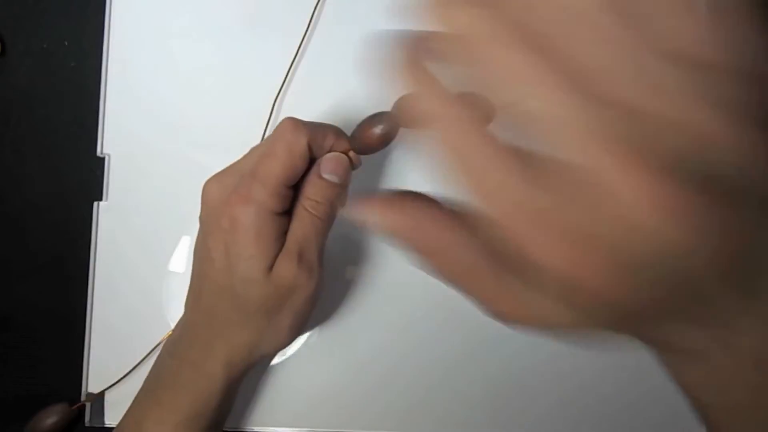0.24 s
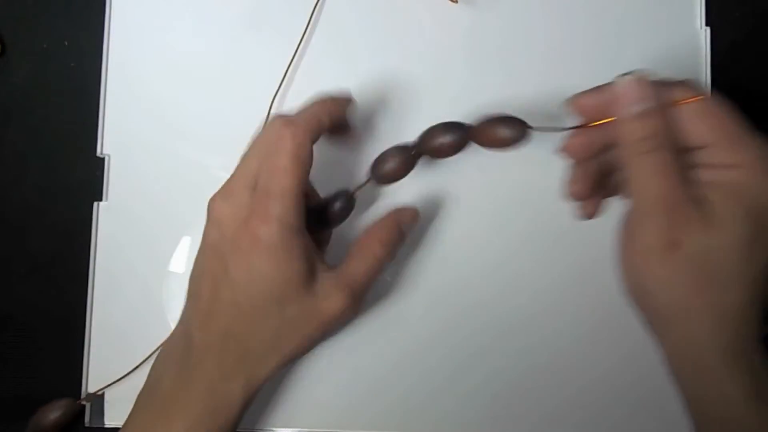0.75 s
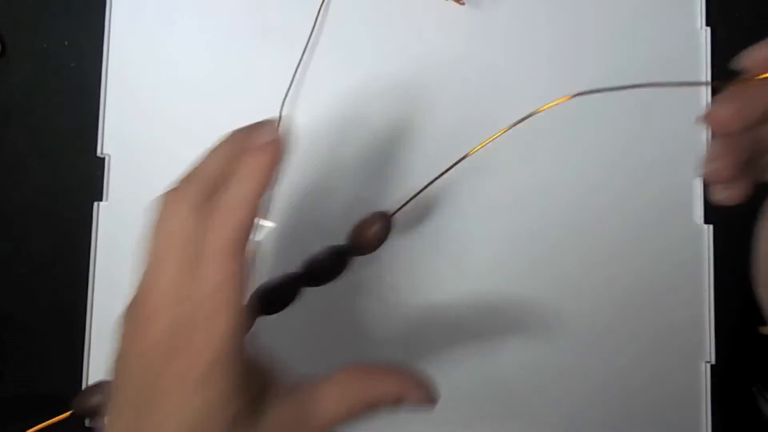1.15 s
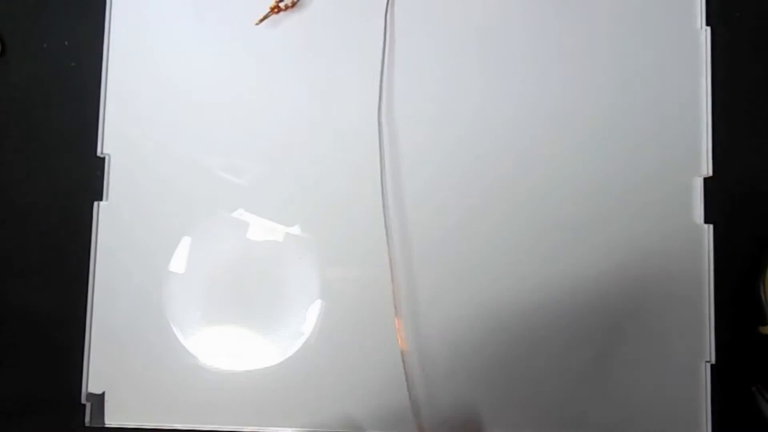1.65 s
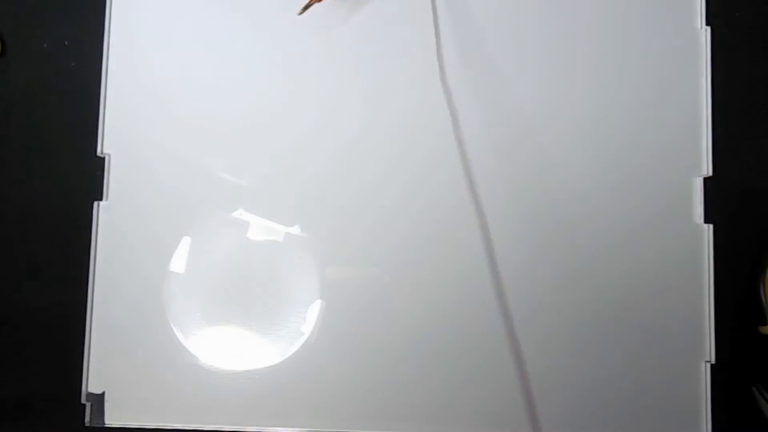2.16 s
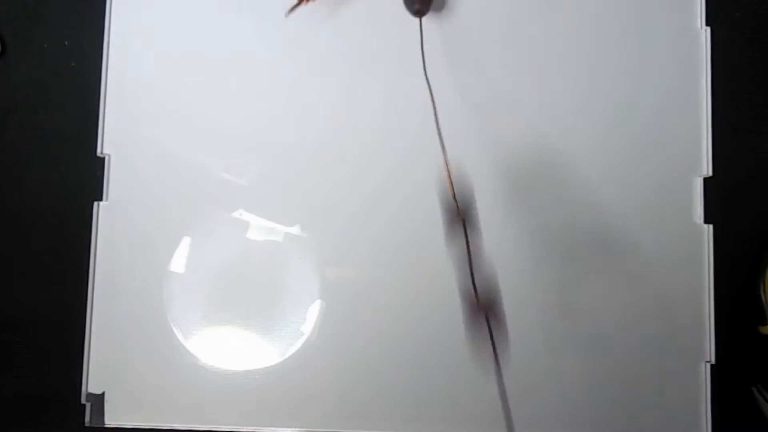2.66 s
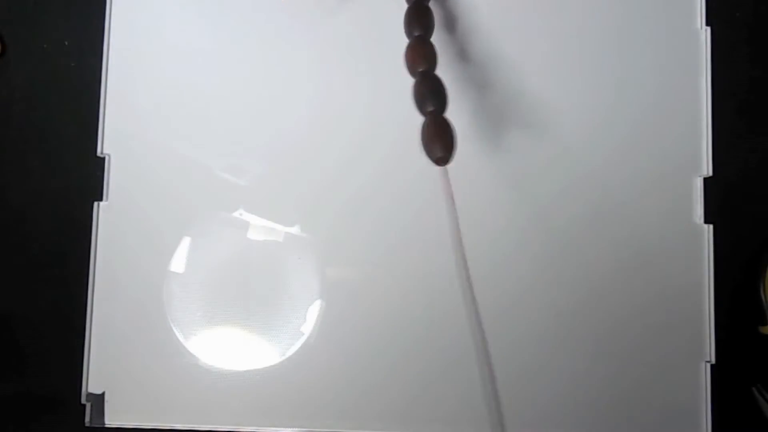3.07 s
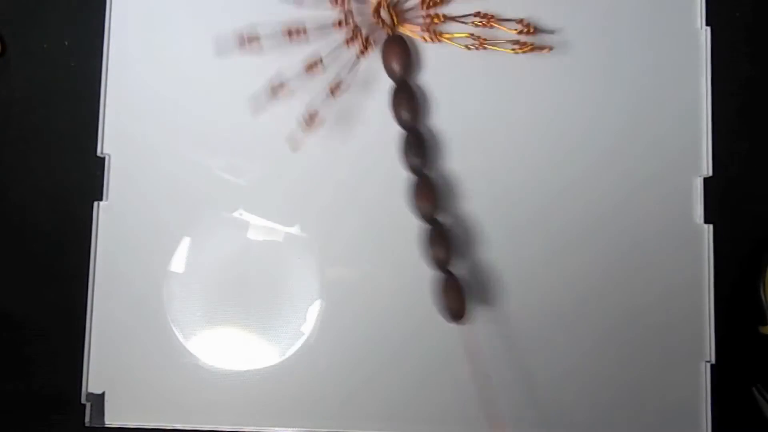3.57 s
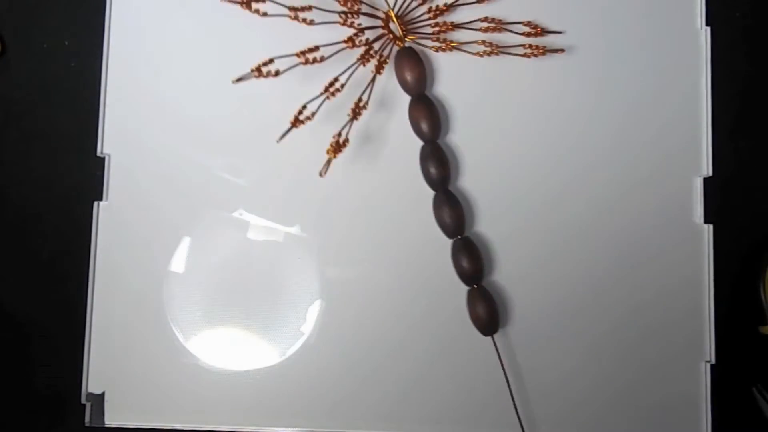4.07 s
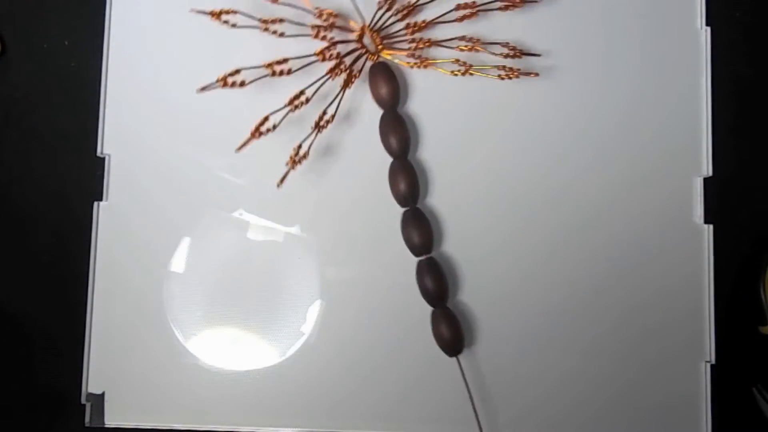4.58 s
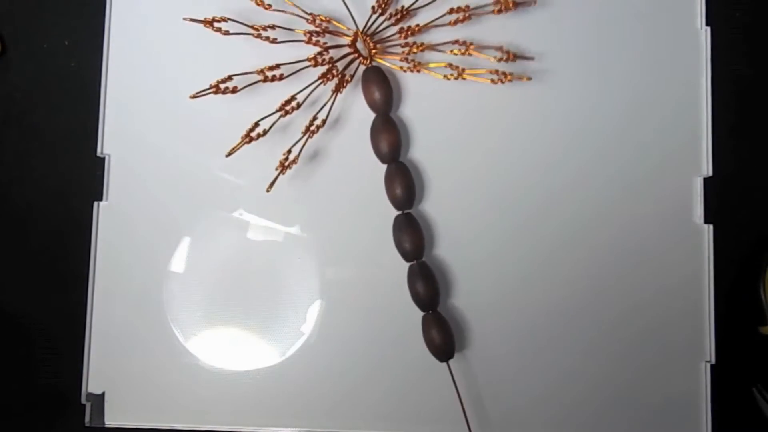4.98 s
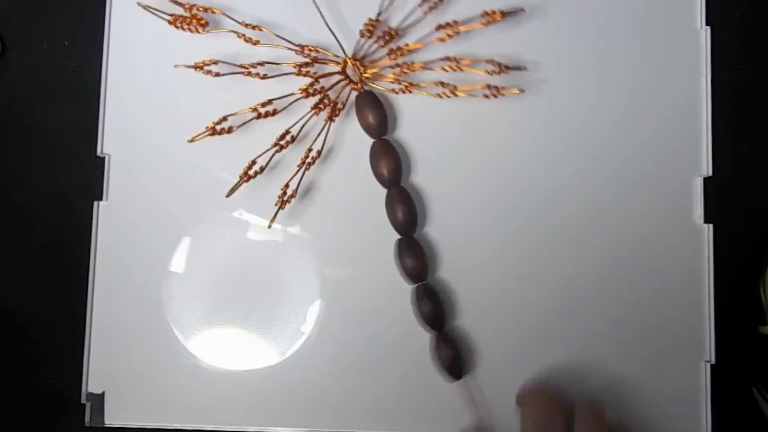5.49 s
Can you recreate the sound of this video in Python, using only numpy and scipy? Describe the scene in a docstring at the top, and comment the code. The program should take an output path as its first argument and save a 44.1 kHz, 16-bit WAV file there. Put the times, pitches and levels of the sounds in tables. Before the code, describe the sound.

Close, dry bead clicks and tiny wire squeaks build to a burst of hard wooden cracks, then faint rattles and dull bumps in a quiet room.

```python
"""Wooden beads on a copper wire above a plastic board in a quiet room, 5.7 s.
Scattered clacks (decaying knock trains through wood modes) open; squeaks (stick-slip tones) and rattles join
from 1.2 s. The loudest clacks fall at 2.6-3.1 s, the strongest table bumps (damped modes) at 4.6-5.0 s.
Clacks, bumps, rattles and squeaks close it. Hand rustle (grainy noise), room noise and hum run throughout."""
import sys
import numpy as np
from scipy import signal
from scipy.fft import rfft, irfft
from scipy.io import wavfile
from scipy.ndimage import uniform_filter1d

SR = 44100
rng = np.random.default_rng(int(sys.argv[2]) if len(sys.argv) > 2 else 0)


def dump(signal):
    """Clip the signal to [-1, 1] and save it as 16-bit WAV at the path in sys.argv[1]."""
    limited = np.clip(np.atleast_2d(signal).T, -1, 1)
    pcm = np.round(limited * 32767).astype(np.int16)
    wavfile.write(sys.argv[1], SR, pcm)


N = 253129


def gain_of(db):
    """Amplitude factor of a level in dB."""
    return 10 ** (np.asarray(db) / 20)


def evened(x):
    """Scale to unit RMS."""
    return x / np.sqrt(np.mean(x ** 2) + 1e-20)


def read(points, hz):
    """Interpolate a (frequency, value) table over log frequency."""
    f, value = np.transpose(points)
    return np.interp(np.log(hz + 1), np.log(f + 1), value)


def add(mix, start_s, sound):
    """Mix a sound in at its start time, cut at the end of the mix."""
    part = mix[round(start_s * SR):][:len(sound)]
    part += sound[:len(part)]


def band(x, lo_hz, hi_hz):
    """Band-pass, then unit RMS."""
    return evened(signal.sosfilt(signal.butter(2, [lo_hz, hi_hz], "band", fs=SR, output="sos"), x))


def highpass(x, order, hz):
    """Remove what lies below a frequency."""
    return signal.sosfilt(signal.butter(order, hz, "high", fs=SR, output="sos"), x)


# wood modes of a bead: (frequency [Hz], width [Hz], lift before scaling [dB])
BEAD_MODES = [(2155, 360, 6.5), (2930, 1700, 4), (4100, 370, 5.5), (5793, 270, 8.5), (6810, 630, 4.5),
              (7940, 570, 1), (7990, 160, 6), (11800, 270, 2.5)]


def wood_pulse(colour, lift_scale, size=1024):
    """Minimum-phase (shortest causal) pulse of a given spectrum, raised at the bead modes."""
    hz = abs(np.fft.fftfreq(size, 1 / SR))
    modes_db = sum(d / (1 + (2 * (hz - f) / w) ** 2) for f, w, d in BEAD_MODES)
    log_gain = (read(colour, hz) + lift_scale * modes_db) * np.log(10) / 20
    return np.fft.ifft(np.exp(np.conj(signal.hilbert(log_gain)))).real[:size // 2]


# later knocks of a clack: (delay [first gaps], level before NEXT_KNOCKS_DB [dB])
LATER_KNOCKS = [(1, 0), (1.75, -3), (2.6, -9), (3.6, -14)]
NEXT_KNOCKS_DB = -4.5  # against the first knock
CHATTER_DB, CHATTER_RISE_S, CHATTER_DECAY_S = -17, 0.0005, 0.0028
TRAIN_SAMPLES = 700


def clack(peak_db, hz, low_db, high_db, gap_ms, luck):
    """The blow runs down the row of beads as quick knocks; the wood rings and chatters briefly."""
    upper_hz = min(1.7 * hz, hz + 2200, 11700)
    colour = [(120, low_db - 32), (400, low_db - 9.5), (1100, low_db),
              (0.87 * hz, -2), (hz, 0), (upper_hz, 0.15 * high_db),
              (12000, high_db), (17000, high_db - 3)]
    train = np.zeros(TRAIN_SAMPLES)
    train[0] = 1
    delay, db = np.transpose(LATER_KNOCKS)
    jitter = 1 + .06 * luck[:len(delay)] * (delay - 1)
    at_ms = delay * np.clip(gap_ms, .1, 2.5) * jitter
    at = np.clip(at_ms * SR / 1000, 0, TRAIN_SAMPLES - 1).astype(int)
    np.add.at(train, at, gain_of(db + NEXT_KNOCKS_DB))
    t = np.arange(TRAIN_SAMPLES) / SR
    chatter_shape = (1 - np.exp(-t / CHATTER_RISE_S)) * np.exp(-t / CHATTER_DECAY_S)
    train += gain_of(CHATTER_DB) * luck * chatter_shape
    sound = np.convolve(train, wood_pulse(colour, lift_scale=0.81))
    sound *= gain_of(peak_db) / abs(sound).max()
    spread = wood_pulse(colour, lift_scale=0.33)
    return sound, spread * np.linalg.norm(sound) / np.linalg.norm(spread)


# bead clacks: (time [s], peak [dB], brightest [Hz], low part [dB], high part [dB],
#               gap to the next knock, capped at 2.5 [ms])
CLACKS = [(0.043, -24.5, 3020, -16, -31, 0.66), (0.1016, -29.5, 2970, -9, -28, 0.72),
          (0.452, -36, 7600, -17, -10, 0.73), (0.766, -39.5, 4260, -11, -23, 1.8),
          (0.8419, -35.5, 2740, 0, -32, 1.63), (0.977, -25.5, 3770, -12, -24, 1.54),
          (0.9866, -30, 3800, -8, -38, 0.62), (1.0985, -38, 2450, -15, -25, 0.93),
          (1.108, -39.5, 2600, -12, -32, 0.78), (1.3115, -32.5, 2090, 7.5, -9.5, 1.17),
          (1.419, -30.5, 2120, 6, -6, 1.5), (1.4646, -32, 1980, 6, -16, 1.5),
          (1.5317, -28, 3740, -14, -26, 1.13), (1.536, -29, 3770, -26, -22, 1.75),
          (1.6235, -31, 6500, -20, -23, 0.56), (1.6334, -40, 5640, -2, -30, 1.2),
          (1.8577, -32.5, 3600, -3, -34, 1.3), (1.8795, -20, 9450, -15, -1, 0.4),
          (1.8868, -25.5, 9090, 5, 2, 2.3), (1.9457, -26, 4580, -31, -31, 1.55),
          (1.9667, -18.5, 6130, -21, -17, 1.1), (2.005, -29.5, 3530, -25, -20, 1.6),
          (2.0237, -17, 4600, -24, -13, 1.36), (2.0373, -26, 3700, -30, -20, 0.32),
          (2.059, -29, 2670, 1, -9, 1.3), (2.118, -24, 3730, -30, -31, 0.76),
          (2.6552, -1, 5400, -12, -23.5, 0.9), (2.673, -1.5, 5060, -6, -25, 0.91),
          (2.8064, -1.5, 4260, -9.5, 0, 0.62), (2.8269, -2, 7330, -13.5, -5.5, 0.26),
          (2.909, 0.5, 7650, -19, -9, 0.59), (3.1016, -4.5, 7100, -18.5, -19, 0.76),
          (3.3351, -22, 9100, -8, -10.5, 0.67), (3.3398, -17.5, 2300, 1.5, -26, 1.06),
          (3.3411, -16.5, 3450, -7, -60, 2.2), (3.3516, -30, 3320, -3, -5, 1.5),
          (3.356, -45, 2360, -3, -45, 0.48), (3.4992, -27, 2110, 2, -44, 0.98),
          (3.5191, -15.5, 4000, -3.5, -39.5, 0.9), (3.528, -25, 2130, 1.5, -50, 0.92),
          (3.5905, -26.5, 3460, -15, -9, 0.75), (3.6249, -29.5, 1890, 0, -36, 0.96),
          (3.743, -32, 8300, -11, -12, 0.7), (3.7615, -34, 1810, 6, -32, 0.31),
          (3.7688, -30.5, 1830, 5.5, -41, 0.7), (3.803, -36, 1830, 9, -39, 2.7),
          (3.857, -33.5, 8000, -8, 4, 0.91), (3.976, -41, 1810, 14, -35, 1.15),
          (4.0507, -18.5, 3400, 1.5, -44, 1.2), (4.4346, -31, 1900, 7, -45, 0.98),
          (4.4407, -35, 1810, 3, -37, 1), (4.5138, -33, 4780, -6, -11, 1.3),
          (4.5283, -34.5, 1830, 9, -40, 0.58), (4.566, -34, 5380, -7, -10, 2.2),
          (4.5719, -29.5, 7920, -1, -9, 1.2), (4.9606, -37.5, 1790, 29, -16, 0.68),
          (5.0382, -36, 6800, -4, -29, 1.5), (5.2145, -40, 1810, 13.5, -52, 0.61),
          (5.3639, -37.5, 1760, 8, -30, 1.6), (5.3998, -36.5, 1810, 1, -44, 1.33),
          (5.411, -37.5, 2080, 6, -49, 1.2), (5.503, -22, 3700, 2, -11, 2),
          (5.5297, -22.5, 2980, -3.5, -43, 1.35), (5.5381, -25, 2250, 5.5, -34, 1.9),
          (5.5848, -33.5, 1820, 2, -34, 0.95), (5.5892, -33.5, 1810, 11, -36, 1.1),
          (5.617, -29.5, 4310, -13, -7, 1.0), (5.6555, -36, 4010, 0, -9, 1.8),
          (5.6675, -26.5, 4010, -6, -9, 0.3), (5.68, -36, 3940, 0, -10, 0.63),
          (5.726, -38, 2240, -10, -24, 0.6)]
# clack share reaching the walls, higher while the string is lifted clear of hands and board:
# (time [s], level [dB])
WALL_SHARE = [(0, -12.5), (1.1, -10), (1.55, -13), (2.0, -8.5), (2.66, -8), (3.1, -8), (3.4, -11.5),
              (4.1, -9.5), (5.74, -10)]


def beads():
    """Dry clacks and rattles; equal energy, smoother colour, goes at the wall share by turns to two places."""
    near, sent = np.zeros(N), np.zeros((2, N))
    rows = CLACKS + rattle()
    luck = rng.standard_normal((len(rows), TRAIN_SAMPLES))
    for k, ((s, *row), r) in enumerate(zip(rows, luck)):
        sound, spread = clack(*row, r)
        share_db = np.interp(s, *np.transpose(WALL_SHARE))
        add(near, s, sound)
        add(sent[k % 2], s, gain_of(share_db) * spread)
    return near, sent


# loose beads rattling faintly: (start [s], end [s], typical peak [dB], typical brightest [Hz])
RATTLES = [(1.32, 1.497, -41, 4500), (1.676, 1.845, -42.5, 4870), (1.85, 1.998, -35.5, 5000),
           (2.033, 2.168, -36, 4500), (3.753, 3.821, -43, 1900), (4.517, 4.622, -41.5, 5000),
           (5.51, 5.599, -35, 2200), (5.623, 5.734, -37, 3000)]
TICKS_PER_RATTLE = 5
TICK_SPREAD_DB, TICK_SPREAD_OCTAVES = 0.5, 0.94  # level: plus or minus; pitch: full range
TICK_LOW_DB, TICK_HIGH_DB = -2, -14


def rattle():
    """Clack rows for ticks at random moments, each a little different in strength, pitch and gap."""
    rows = []
    luck = rng.random((len(RATTLES), TICKS_PER_RATTLE, 4))
    for (start, end, db, hz), ticks in zip(RATTLES, luck):
        for when, size, pitch, gap in ticks:
            s = start + when * (end - start)
            tick_db = db + TICK_SPREAD_DB * (2 * size - 1)
            tick_hz = hz * 2 ** (TICK_SPREAD_OCTAVES * (pitch - .5))
            rows.append((s, tick_db, tick_hz, TICK_LOW_DB, TICK_HIGH_DB, .5 + gap))
    return rows


# squeaks of a bead hole on the wire:
# (time [s], fundamental peak [dB], pitch [Hz], length [s], octave overtone at the start [dB])
SQUEAKS = [(1.229, -47.5, 1098, 0.016, 5), (1.311, -47.5, 1106, 0.019, 4.5), (1.372, -47, 1080, 0.025, 7.5),
           (1.389, -52, 1093, 0.077, 11.5), (1.422, -48.5, 1090, 0.014, -7), (1.462, -45.5, 1107, 0.026, 5),
           (1.485, -46.5, 1096, 0.026, 6), (1.547, -59, 1075, 0.02, -17), (1.61, -47, 1087, 0.014, 8),
           (1.62, -54, 1096, 0.029, -12), (1.752, -51, 1070, 0.015, 4), (1.787, -53, 1040, 0.015, -17),
           (1.827, -50.5, 1063, 0.018, -5), (2.044, -47.5, 1076, 0.021, 8.5),
           (2.069, -50, 1103, 0.022, -10), (2.601, -56, 1420, 0.056, -8), (5.39, -51, 15182, 0.022, 2),
           (5.651, -60, 2000, 0.011, 16), (5.664, -51, 2030, 0.016, 13), (5.681, -50, 2090, 0.011, 2),
           (5.715, -51.5, 2144, 0.03, 0)]
THIRD_PARTIAL_DB, NEXT_PARTIAL_STEP_DB, OVERTONE_FADE_DB = -5.5, -12.5, -13
WAVER_RAW_HZ = 190  # RMS before smoothing over 60 samples


def squeaks():
    """Stick-slip of the hole on the wire: short wavering tones whose overtones die first."""
    out = np.zeros(N)
    luck = rng.standard_normal((len(SQUEAKS), 2600))
    for (s, db, hz, length_s, second_db), r in zip(SQUEAKS, luck):
        u = np.minimum(np.arange(2600) / SR / length_s, 1)
        pitch_hz = hz + WAVER_RAW_HZ * uniform_filter1d(r, size=60)
        phase = 2 * np.pi * np.cumsum(pitch_hz) / SR
        overtones = gain_of(second_db) * np.sin(2 * phase)
        for k in range(4):
            partial_db = THIRD_PARTIAL_DB + k * NEXT_PARTIAL_STEP_DB
            overtones += gain_of(partial_db) * np.sin((k + 3) * phase)
        fits = 6 * hz < SR / 2  # otherwise fundamental only
        tone = np.sin(phase) + fits * gain_of(OVERTONE_FADE_DB * u) * overtones
        add(out, s, gain_of(db) * tone * np.sin(np.pi * u ** 0.63) ** 1.1)
    return out


# table bumps: (time [s], peak [dB], favoured pitch [Hz], frame share [dB])
BUMPS = [(0.679, -48.5, 522.4, -23), (2.656, -28.5, 705, -40), (2.699, -36.5, 334, -35),
         (3.344, -41, 555, -26), (3.609, -48, 448, -22), (4.054, -40, 680, -31.5), (4.289, -45.5, 590, -27),
         (4.634, -28.5, 332, -28.5), (4.654, -44, 400, -28), (4.672, -42, 405, -29.5),
         (4.779, -39.5, 454, -33), (4.958, -17.5, 556, -23.5), (4.963, -25, 724, -29),
         (4.974, -27.5, 225, -23), (4.987, -33, 246, -28), (5.504, -32, 208, -20), (5.513, -43.5, 251, -21),
         (5.688, -50, 660, -26)]
# table-top modes: (frequency [Hz], width [Hz], level [dB])
TABLE_TOP = [(203, 92, -7), (267, 90, -11), (339, 84, 4), (440, 100, -6.5), (566, 89, 5), (701, 140, 2.5),
             (840, 110, -5), (1116, 320, 0.5), (1600, 600, 11)]
# slow modes of the table frame: (frequency [Hz], level [dB], T60 [s])
TABLE_FRAME = [(141, 1, .85), (78, -3, .5)]
BLOW_MS, CONTACT_MS, CONTACT_DB = 5.4, 0.48, 0.5  # rough blow; short firm contact within it
PLACE_DB_PER_OCTAVE, TOP_LOWEST_HZ, FRAME_SWELL_S = -18, 146, 0.03


def bumps():
    """A soft rough blow shakes the damped table top; the frame swells and rings on."""
    out, t = np.zeros(N), np.arange(SR // 2) / SR
    luck = rng.standard_normal((len(BUMPS), 2500))
    frame = sum(gain_of(d - 60 * t / t60) * np.sin(2 * np.pi * f * t) for f, d, t60 in TABLE_FRAME)
    frame *= 1 - np.exp(-(t / FRAME_SWELL_S) ** 2)
    t_top = t[:3000]
    u = t[:2500] * 1000 / BLOW_MS
    v = np.maximum(u - .5, 0) * BLOW_MS / CONTACT_MS
    firm = v * np.exp(-3 * v)
    for (s, db, hz, frame_db), r in zip(BUMPS, luck):
        ring = np.zeros(3000)
        for f, w, d in TABLE_TOP:
            # place of the blow favours modes near its pitch
            mode_db = d + PLACE_DB_PER_OCTAVE * abs(np.log2(f / hz))
            ring += gain_of(mode_db) * np.exp(-np.pi * w * t_top) * np.sin(2 * np.pi * f * t_top)
        rough = r * u ** 2 * np.exp(-3 * u)
        blow = rough / np.linalg.norm(rough) + gain_of(CONTACT_DB) * firm / firm.sum()
        sound = highpass(signal.oaconvolve(ring, blow), 2, TOP_LOWEST_HZ)
        add(out, s, gain_of(db) * sound / abs(sound).max())
        add(out, s, gain_of(db + frame_db) * frame)
    return out


# hand friction on wire and table:
# (time [s], low rumble [dB], middle rustle [dB], high hiss [dB])
HANDS = [(0.0, -63.5, -68, -72), (0.37, -71, -85, -75), (0.75, -63.5, -71, -72), (1.2, -69.5, -68, -82),
         (1.4, -58.5, -61, -62.5), (1.85, -59.5, -62, -70.5), (2.03, -58, -52, -72), (2.25, -63, -68, -70),
         (2.6, -69, -67, -70), (2.849, -61.5, -61, -70), (3.3, -67, -67, -61), (3.6, -53.5, -68, -75),
         (4.2, -60, -69, -68), (4.47, -61.5, -80, -71), (4.6, -53.5, -56, -87), (5.0, -63, -80, -66.5),
         (5.48, -64.5, -76, -77), (5.64, -52.5, -59.5, -75), (5.74, -53, -54, -75)]
HAND_BANDS_HZ = [(130, 1390), (1300, 6600), (6500, 15600)]
GRAIN_RMS_DB = 8.3 / 2.76


def hands():
    """Grainy friction noise in three registers, each following its part of the movement."""
    s, *levels = np.transpose(HANDS)
    t = np.arange(N) / SR
    grain_db = GRAIN_RMS_DB * band(rng.standard_normal(N), 3.1, 120)
    noises = rng.standard_normal((3, N)) * gain_of(grain_db)
    return sum(gain_of(np.interp(t, s, db)) * band(noise, *edges)
               for db, noise, edges in zip(levels, noises, HAND_BANDS_HZ))


# reverberation: (frequency [Hz], T60 [s])
ROOM_T60 = [(200, 0.43), (800, 0.3), (2000, 0.31), (5500, 0.48), (10000, 0.32), (15000, 0.18)]
# reverberation colour: (frequency [Hz], level [dB])
ROOM_COLOUR = [(200, 0), (800, 7.5), (2500, 3), (6000, -3), (10000, -6), (15000, -1.5)]
WALL_MS, WALL_DB = 13, -6  # slightly scattered wall echo; energy against the tail


def room(x):
    """Random-sign reflections from 5.4 ms on die band by band; one wall adds an echo."""
    taps = np.zeros(SR // 2)
    at = np.arange(240, len(taps) - 12, 12)
    taps[at + rng.integers(0, 12, len(at))] = rng.choice([-1., 1.], len(at))
    hz, t, z = signal.stft(taps, SR, nperseg=128)
    decay_db = read(ROOM_COLOUR, hz)[:, None] - 60 * t / read(ROOM_T60, hz)[:, None]
    tail = signal.istft(z * gain_of(decay_db), SR, nperseg=128)[1]
    tail /= np.linalg.norm(tail)
    echo = rng.standard_normal(40) * np.hanning(40)
    add(tail, WALL_MS / 1000, gain_of(WALL_DB) * echo / np.linalg.norm(echo))
    return signal.oaconvolve(x, tail)[:N]


# noise spectrum of room and electronics: (frequency [Hz], relative level per Hz [dB])
AIR_COLOUR = [(35, -43), (60, -13.5), (149, -8.5), (202, -5), (338, -8.5), (566, -9.5), (862, -15),
              (1010, -14.5), (1280, -20.5), (1440, -19.5), (2190, -17.5), (3120, -19.5), (16000, -26)]
AIR_RMS_DB = -60.5
# hum: (frequency [Hz], RMS level [dB])
HUM = [(48.4, -84)]


def air():
    """Steady shaped noise of room and electronics, with a faint hum."""
    hz, t = np.fft.rfftfreq(N, 1 / SR), np.arange(N) / SR
    hum = sum(gain_of(db) * np.sqrt(2) * np.sin(2 * np.pi * f * t) for f, db in HUM)
    noise = irfft(rfft(rng.standard_normal(N)) * gain_of(read(AIR_COLOUR, hz)), N)
    return hum + gain_of(AIR_RMS_DB) * evened(noise)


def scene():
    """Sum the direct sources, their room reflections and the background."""
    near, sent = beads()
    squeak, bump = squeaks(), bumps()
    walls = room(sent[0] + gain_of(-10.0) * squeak) + room(sent[1] + gain_of(-6.5) * bump)
    # small objects radiate no deep bass
    close = highpass(near + squeak + bump + walls + hands(), 6, 95)
    return (close + air())[None]


TREBLE_EDGE_HZ = 16050


def record(dry):
    """Limit the treble with a steep linear-phase low-pass."""
    lowpass = signal.firwin(255, TREBLE_EDGE_HZ, window=("kaiser", 8), fs=SR)
    return signal.oaconvolve(dry, lowpass[None], "same")


dry = scene()
out = record(dry)
dump(out)
```